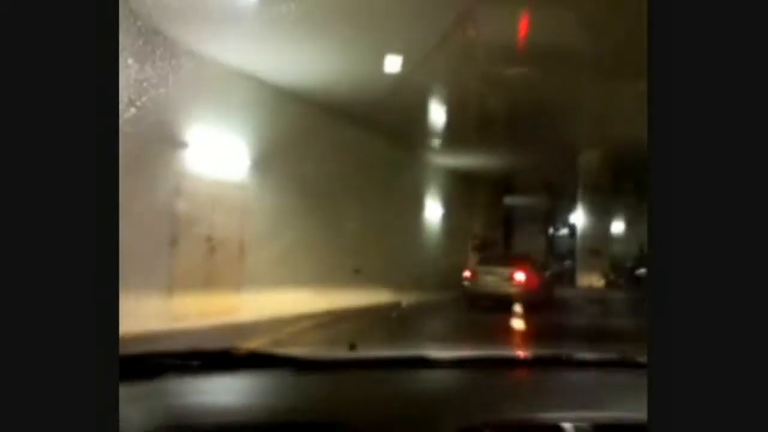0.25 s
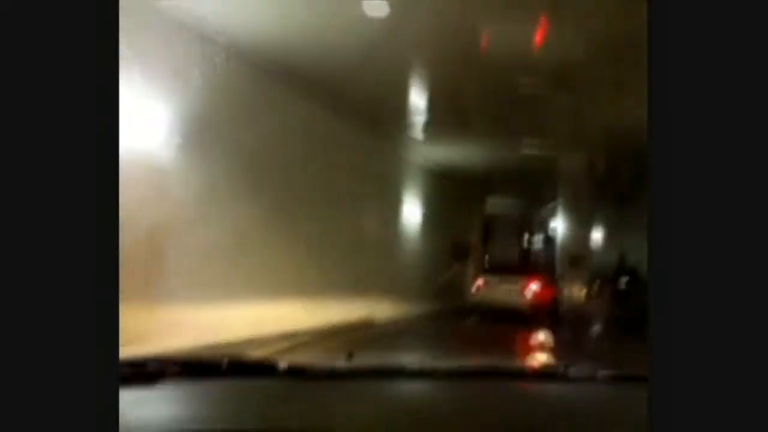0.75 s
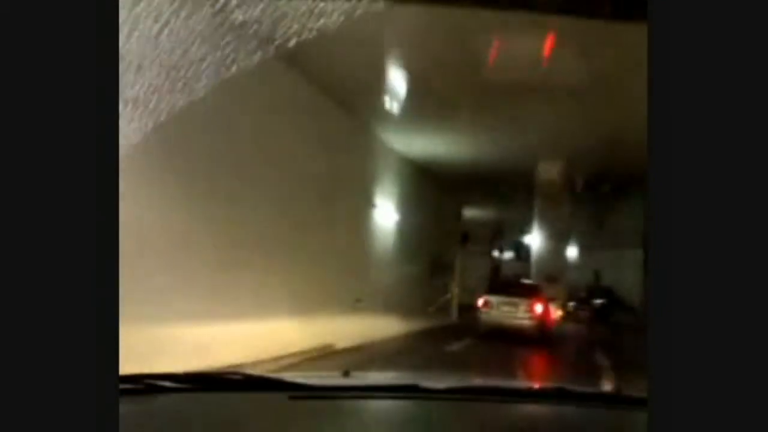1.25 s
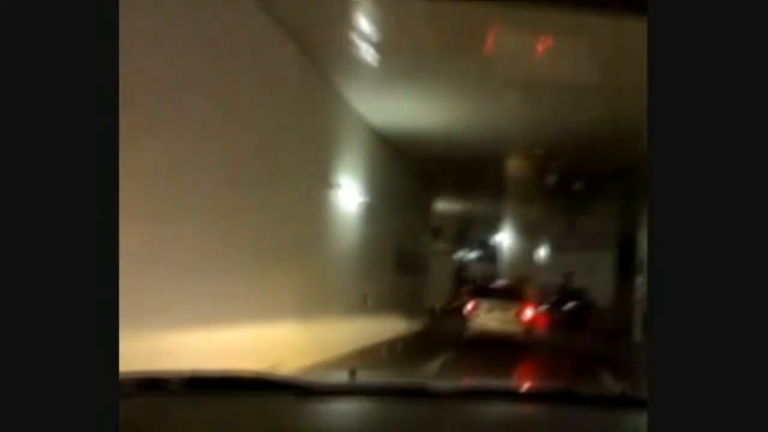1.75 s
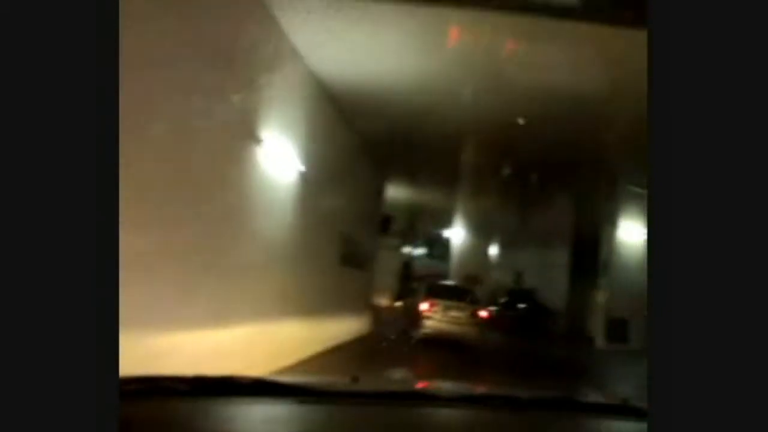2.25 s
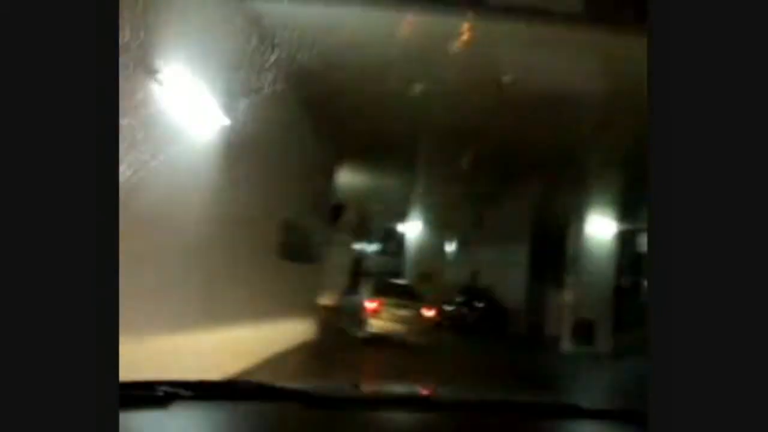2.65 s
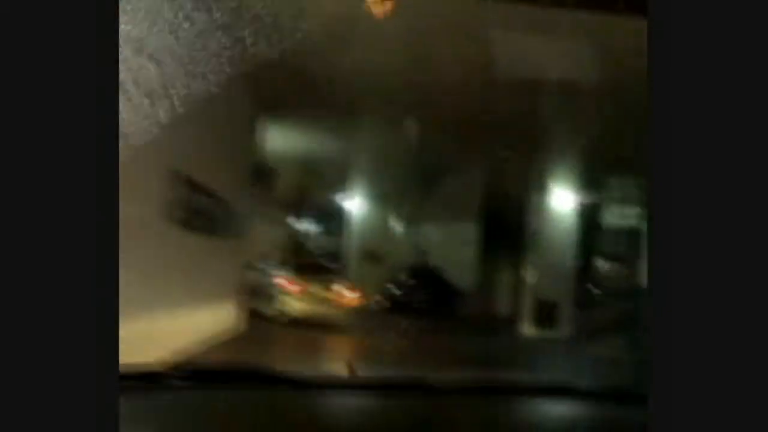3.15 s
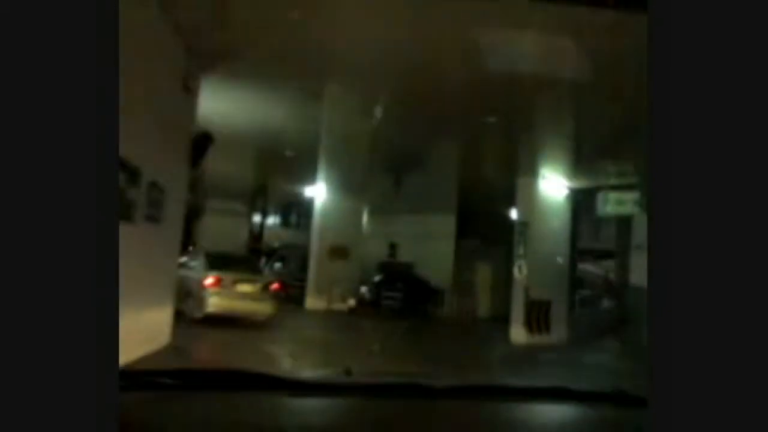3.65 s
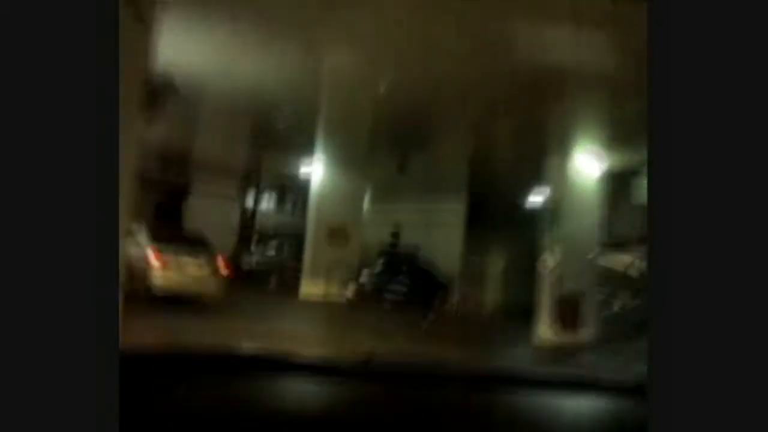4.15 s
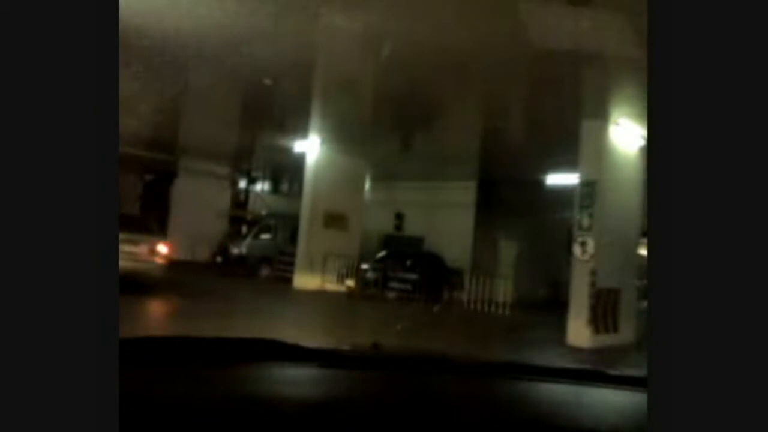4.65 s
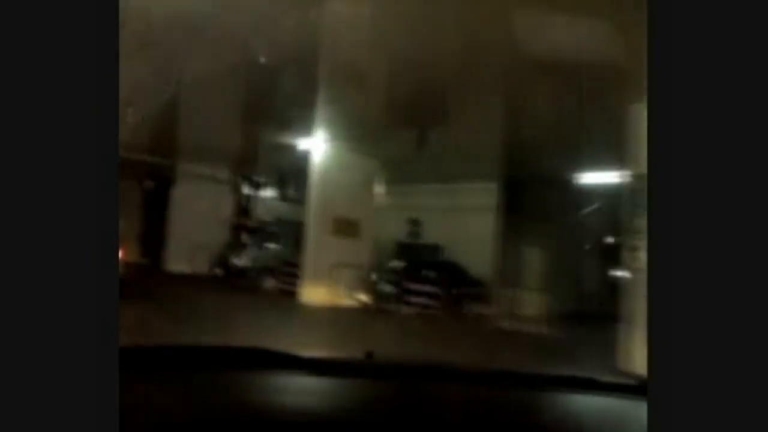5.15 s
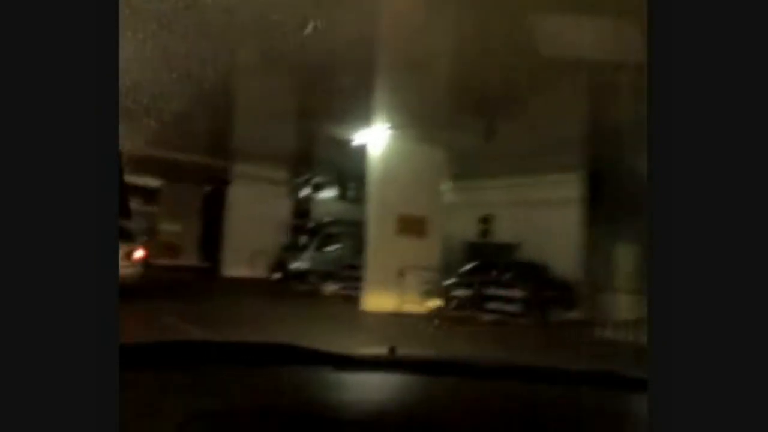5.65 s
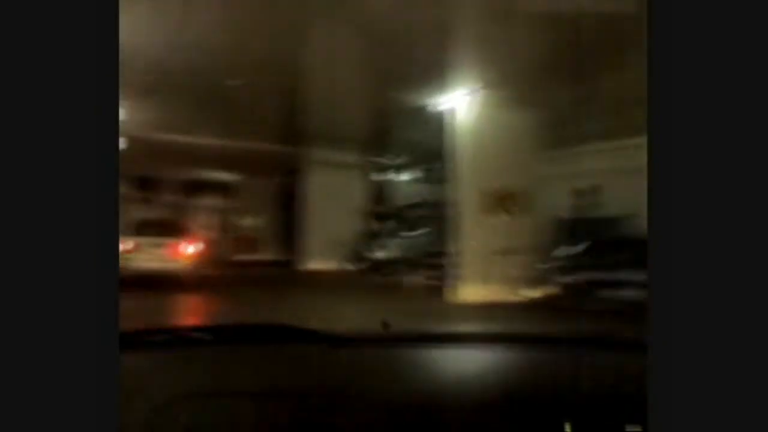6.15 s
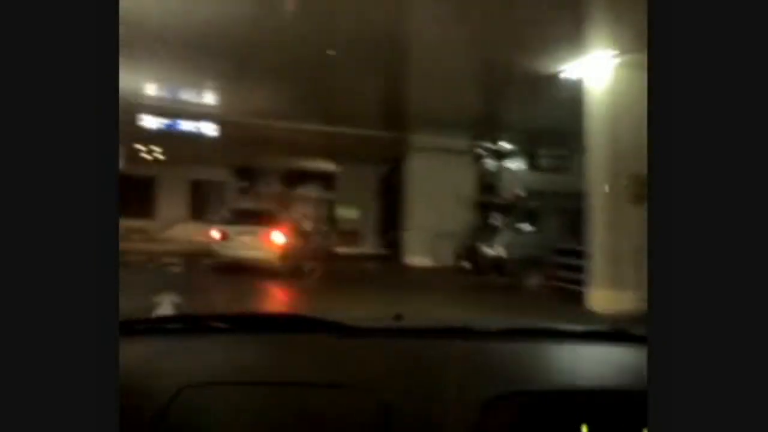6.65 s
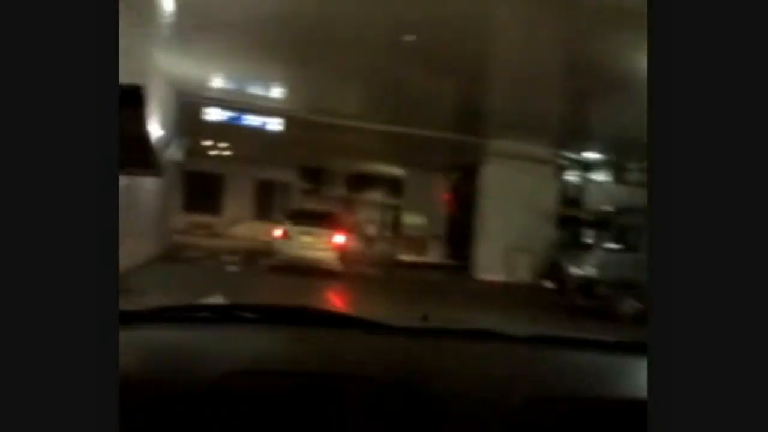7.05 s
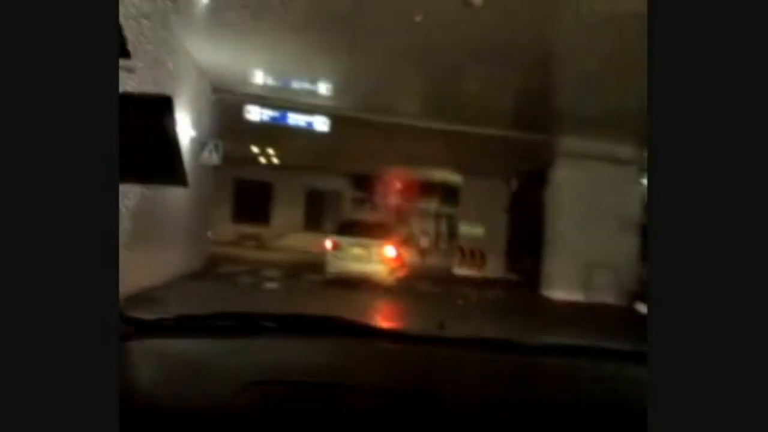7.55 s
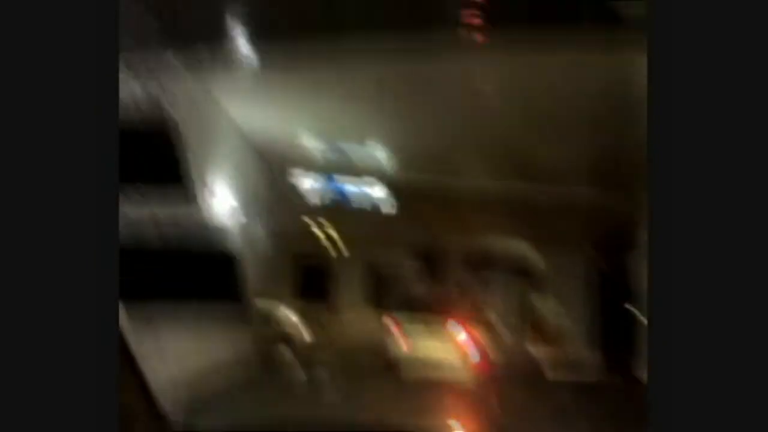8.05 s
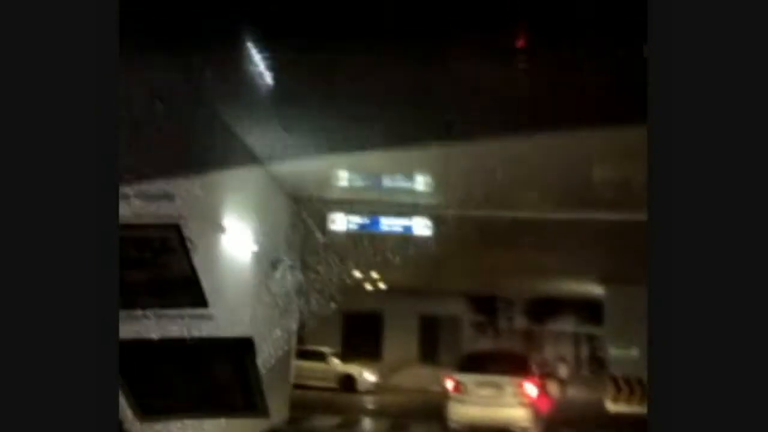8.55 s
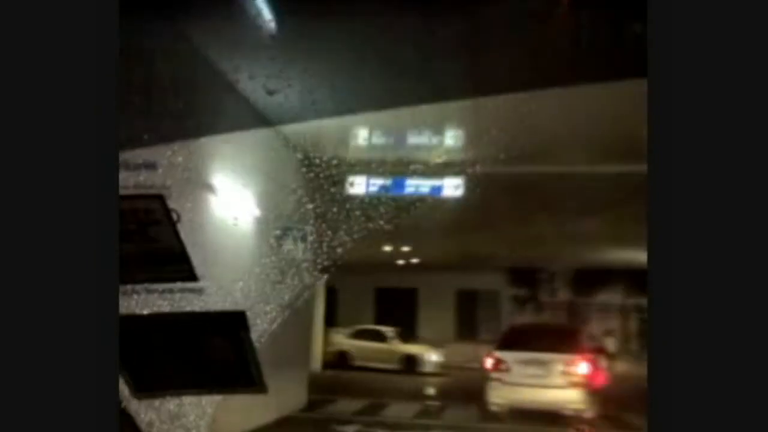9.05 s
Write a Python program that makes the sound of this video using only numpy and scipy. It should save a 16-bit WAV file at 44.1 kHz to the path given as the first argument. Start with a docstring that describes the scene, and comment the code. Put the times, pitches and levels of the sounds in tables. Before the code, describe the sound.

A muffled, droning car cabin creeps along concrete, its engine easing towards idle while trim clicks, body thumps and fingers scrape the camera.

```python
"""Inside a car creeping up the ramps of a multi-storey car park, heard by a small hand-held camera.
The engine and drive train hum slowly, built from sine waves that drift a little in pitch and strength.
Shaped noise makes the boom of the body, the rumble and roar of the tyres and the faint hiss of the wet deck.
Bumps knock the body, and plastic trim ticks and squeaks: short rings, noise bursts and sliding tones.
A hand taps and scrapes the camera, whose shell rings, and a sleeve rubs against the seat."""
import sys
import numpy as np
from scipy import signal
from scipy.fft import rfft, irfft, next_fast_len
from scipy.io import wavfile
from scipy.ndimage import uniform_filter1d

SR = 44100
rng = np.random.default_rng(int(sys.argv[2]) if len(sys.argv) > 2 else 0)


def persist_wave(psi):
    """Save psi, clipped to +-1, as 16-bit WAV."""
    counts = np.round(np.clip(psi, -1, 1) * 32767).astype(np.int16)
    wavfile.write(sys.argv[1], SR, np.atleast_2d(counts).T)


N = 409688
TIME = np.arange(N) / SR  # seconds


def undb(db):
    """Turn decibels into a gain."""
    return 10 ** (np.asarray(db) / 20)


def unit(x):
    """Scale a signal to an rms of 1."""
    return x / np.sqrt(np.mean(x ** 2) + 1e-18)


def seconds(length):
    """Time in seconds at each of a number of samples."""
    return np.arange(length) / SR


def curves(table):
    """Draw straight lines between the rows of a table, giving each column at every sample."""
    s, *columns = np.transpose(table)
    return [np.interp(TIME, s, column) for column in columns]


def walk(rate):
    """Smooth random wandering with an rms of 1, which takes a new direction rate times a second."""
    k = int(SR / rate)
    steps = np.repeat(rng.uniform(-1, 1, size=4096)[:N // k + 1], k)
    smooth = uniform_filter1d(uniform_filter1d(steps, k), k)
    return unit(smooth[:N])


def grain(length, size):
    """Quick random flutter with an rms of 1, smoothed over size samples."""
    return unit(uniform_filter1d(rng.standard_normal(length), size=size))


def noise(colour, size=N):
    """Noise of rms 1 with a spectrum of (Hz, dB) points, falling away beyond its ends."""
    hz, db = np.transpose(colour)
    n = next_fast_len(size)
    log_f = np.log(np.maximum(np.fft.rfftfreq(n, 1 / SR), 1))
    beyond = np.abs(log_f - np.clip(log_f, np.log(hz[0]), np.log(hz[-1])))
    gain = undb(np.interp(log_f, np.log(hz), db)) * np.exp(-2 * beyond)
    white = rng.standard_normal(n)
    return unit(irfft(rfft(white) * gain, n)[:size])


def steady(x, span_s):
    """Even out the slow swells of a noise by dividing by its local rms."""
    local_power = uniform_filter1d(x ** 2, max(int(span_s * SR), 2))
    return x / np.sqrt(local_power + 1e-9)


def add(out, s, sound):
    """Mix a sound in at a time in seconds."""
    i = int(s * SR)
    out[i:i + len(sound)] += sound[:N - i]


def fade(t, t60):
    """Exponential decay, 60 dB down after t60 seconds."""
    return np.exp(-np.log(1000) * t / t60)


def resonate(x, modes, strength):
    """Lift a sound at resonances: strongly when the part is touched, less for sound through the air."""
    lifted = 0
    for hz, width_hz, db in modes:
        b, a = signal.iirpeak(hz, hz / width_hz, fs=SR)
        lifted = lifted + (undb(db) - 1) * signal.lfilter(b, a, x)
    return x + strength * lifted


# The engine pulls up the ramp, then drops towards idle.
# Each row: time in seconds, firing rate in Hz before a small waver, level in dB before an overall trim.
ENGINE_CURVE = [(0, 40.69, -38.5), (.8, 41.55, -33), (1.5, 41.49, -36.5), (2.1, 40.64, -33.5),
                (2.8, 42.64, -35.5), (3.5, 40.7, -33.5), (4.3, 42.57, -43), (5.1, 43.1, -41.5),
                (5.85, 33.74, -45), (9.29, 33.19, -47.5)]
# Tones of the engine as they reach the cabin; the half multiples are the throb of uneven firing.
# Each row: multiple of the firing rate, average level in dB when pulling, average level in dB near idle.
ENGINE_ORDERS = [(1, 5, 2), (1.5, -11.5, -7), (2, -4, 0.5), (2.5, -7.5, -9), (3, -5.5, 3.5),
                 (3.5, -12, -4.5), (4, 0.5, -2.5), (4.5, -17, -9), (5, -18, -14), (6, -18.5, -10.5),
                 (8, -19, -20.5)]
PULL_HZ, IDLE_HZ = 40.4, 34  # firing rates under load and near idle


def engine(level_db=-2, waver_db=2.0):
    """Multiples of the firing rate, balanced by load; the mounts pass each one a little unevenly."""
    hz, db = curves(ENGINE_CURVE)
    load = np.clip((hz - IDLE_HZ) / (PULL_HZ - IDLE_HZ), 0, 1)
    hz = hz * (1 + .008 * walk(16))
    phase = 2 * np.pi * np.cumsum(hz) / SR
    hum = 0
    for multiple, pull_db, idle_db in ENGINE_ORDERS:
        order_db = idle_db + load * (pull_db - idle_db) + waver_db * walk(12)
        start_phase = 2 * np.pi * rng.random()
        hum = hum + undb(order_db) * np.sin(multiple * phase + start_phase)
    return hum * undb(db + level_db)


# The hum of the drive train.
# Each row: time in seconds, pitch in Hz before it drifts, level in dB before drift and an overall trim.
DRIVE_HUM_CURVE = [(0, 93, -45.5), (.8, 93.5, -40), (1.7, 89.5, -43), (2.5, 92, -41.5), (3.3, 91, -38),
                   (4.2, 91, -47.5), (5.3, 95, -40), (5.9, 101, -39), (6.6, 98, -40.5), (7.5, 100, -41.5),
                   (8.2, 94, -40), (9.29, 95, -45)]


def drive_hum(level_db=-1, waver_db=2.5, wander=0.0075):
    """A clean, low hum from the turning drive train that drifts in pitch and strength."""
    hz, db = curves(DRIVE_HUM_CURVE)
    phase = 2 * np.pi * np.cumsum(hz * (1 + wander * walk(9))) / SR
    return np.sqrt(2) * np.sin(phase) * undb(db + level_db + waver_db * walk(7))


# A jolt builds up, holds while the wheels cross the rough spot, then dies away.
JOLT_RISE_S, BOOM_T60_S, RUMBLE_T60_S = 0.033, 0.7, 0.1


def jolt(start_s, hold_s, t60):
    """Rise, hold and dying away of the shaking from one rough spot."""
    t = TIME - start_s
    return np.clip(t / JOLT_RISE_S, 0, 1) * fade(np.maximum(t - JOLT_RISE_S - hold_s, 0), t60)


# Colours of the body boom, the rumble of the cabin air and the tread roar.
# Each row: frequency in Hz, relative strength in dB per Hz.
BOOM_COLOUR = [(13, -27.5), (20, -5), (26, -1), (31, -1), (36, -9), (42, 6.5), (46.5, -10.5), (54, -26),
               (80, -33.5)]
RUMBLE_COLOUR = [(40, -23), (58, -6), (74, -1.5), (82, -6.5), (91, -2), (99, -2.5), (108, 0.5), (119, -4),
                 (130, 0), (146, -4.5), (158, -8.5), (174, -10.5), (190, -22.5), (260, -39)]
ROAR_COLOUR = [(130, -14), (205, 6), (240, -1.5), (275, -1.5), (380, -0.1), (455, -1.5), (560, -5.5),
               (650, -10.5), (810, -8.5), (930, -13), (1150, -14), (1450, -17.5), (2000, -24.5),
               (4000, -36.5)]
# Panels that colour the tread roar.
# Each row: frequency in Hz, width in Hz, lift in dB at full strength.
ROAR_PANELS = [(286.6, 20, 5), (338, 6.2, 4), (373.6, 16, 5), (449.5, 18, 4.5), (493, 7.7, 4.5),
               (545, 20, 4), (816, 16, 4), (1090, 38, 2.5)]
# Rough spots in the deck.
# Each row: start in seconds, body boom in dB, tyre rumble in dB, hold in seconds.
ROUGH_SPOTS = [(0.28, -26, -30, .03), (0.736, -27.5, -40.5, 0.17), (0.85, -36, -34, 0.13),
               (1.302, -23, -39, 0.1), (1.448, -27.5, -35.5, 0.28), (2.334, -26.5, -40, 0.16),
               (2.794, -35, -35, 0.15), (3.194, -30.5, -31.5, 0.049), (3.495, -30, -32.5, .03),
               (3.999, -32, -34, 0.29), (4.486, -24.5, -28, 0.034), (4.69, -29, -46, 0.15),
               (5.366, -27.5, -33.5, 0.24), (5.55, -29, -28.5, 0.019), (5.929, -30, -36, 0.022),
               (6.174, -30, -33, 0.034), (6.487, -39, -37.5, 0.017), (6.59, -28, -55, 0.19),
               (7.022, -28, -51, 0.035), (7.475, -30.5, -35, 0.016), (7.755, -47, -29.5, 0.031),
               (8.405, -32, -29, 0.12), (8.685, -30.5, -36.5, 0.38)]
BOOM_DB, RUMBLE_DB = -33, -35  # on smooth concrete
ROAR_DB, ROAR_FALL_DB_PER_S = -42.5, 0.5865  # at the start, and its steady fall as the car slows


def road(patchy_db=1.0):
    """Concrete shakes the tyres: the body booms, the cabin air rumbles, the tread roars in patches."""
    boom_power, rumble_power = undb(BOOM_DB) ** 2, undb(RUMBLE_DB) ** 2
    for s, boom_db, rumble_db, hold_s in ROUGH_SPOTS:
        boom_power = boom_power + (undb(boom_db) * jolt(s, hold_s, BOOM_T60_S)) ** 2
        rumble_power = rumble_power + (undb(rumble_db) * jolt(s, hold_s, RUMBLE_T60_S)) ** 2
    body = steady(noise(BOOM_COLOUR), 0.099) * np.sqrt(boom_power)
    air = steady(noise(RUMBLE_COLOUR), .12) * np.sqrt(rumble_power)
    roar_db = ROAR_DB - ROAR_FALL_DB_PER_S * TIME + patchy_db * walk(22)
    tread = unit(resonate(noise(ROAR_COLOUR), ROAR_PANELS, strength=0.78)) * undb(roar_db)
    return body + air + tread


# Knocks through the body; the row at 7.928 s is the low body of a knock on the camera. # Each row: start in
# seconds, level in dB, pitch in Hz where the blow is strongest, # time in seconds for the crowded modes to fade
# by 60 dB.
KNOCKS = [(2.055, -34.5, 440, 0.12), (2.056, -44, 266, 0.17), (5.505, -33, 450, 0.11),
          (5.504, -40, 1765, 0.075), (5.551, -29, 340, 0.11), (5.555, -46.5, 1650, .09),
          (5.583, -34, 300, 0.11), (5.598, -27, 262, 0.12), (5.599, -27, 435, 0.082),
          (5.601, -31, 780, 0.055), (5.601, -33, 1290, 0.065), (5.602, -41.5, 2500, 0.075),
          (5.606, -24.5, 127, 0.17), (5.619, -38, 1200, 0.062), (6.431, -30.5, 826, 0.048),
          (6.431, -40, 1800, .03), (6.436, -33.5, 1210, 0.035), (6.443, -31, 531, 0.07),
          (6.465, -45.5, 1580, .06), (6.521, -35, 1400, 0.035), (7.928, -34, 380, 0.096),
          (8.443, -35, 418, 0.15), (8.444, -32.5, 206, 0.16), (8.441, -42, 1037, 0.12),
          (8.475, -34, 380.5, 0.065), (8.518, -32.5, 418, 0.11), (8.535, -34, 134, 0.27),
          (8.548, -43.5, 1060, 0.19)]
# The body panel under a knock.
# Each row: multiple of the knock's pitch, relative strength in dB per Hz.
PANEL_COLOUR = [(.15, -15.5), (.4, 3.5), (.75, -0.5), (1, -0.5), (1.5, -19.5), (2.6, -21.5), (4, -23),
                (7, -28), (16, -49)]
# Low modes of the dashboard.
# Each row: frequency in Hz, relative level in dB, time in seconds to fade by 60 dB.
DASH_MODES = [(127, 8.5, 0.26), (160, -8.5, 0.16), (266, 3.5, 0.14), (355, -2.5, 0.18), (441, -2, 0.11),
              (794, 0.5, 0.087)]


def knocks(rise_s=0.0013, ring_db=1, dash_db=-6, reach=0.62, padding_hz=2600):
    """A bump jolts a padded panel: a damped main mode among crowded ones, and the dashboard hums on. The row at
    7.928 s instead gives low body to a finger knocking the camera."""
    out, t = np.zeros(N), seconds(SR // 4)
    for s, db, hz, t60 in KNOCKS:
        colour = [(hz * multiple, d) for multiple, d in PANEL_COLOUR]
        crowd = steady(noise(colour, size=len(t)), 0.032) * fade(t, t60)
        mode = undb(ring_db) * np.sin(2 * np.pi * hz * t) * fade(t, t60 * 2 / 3)
        dash = 0
        for f, d, ring_t60 in DASH_MODES:
            # modes near the pitch of the blow are set ringing most; reach is in octaves
            nearness = np.exp(-(np.log2(f / hz) / reach) ** 2 / 2)
            dash = dash + undb(d + dash_db) * nearness * np.sin(2 * np.pi * f * t) * fade(t, ring_t60)
        add(out, s, undb(db) * (crowd + mode + dash) * (1 - np.exp(-t / rise_s)))
    padding = signal.butter(2, padding_hz, fs=SR, output="sos")
    return signal.sosfilt(padding, out)


# Plastic ticks.
# Each row: start in seconds, peak in dB before the force setting, treble in dB, which sets the brightness.
TICKS = [(2.3255, -41.5, -71), (2.8424, -49.5, -51), (2.9916, -45, -43.5), (3.419, -41, -44),
         (3.6435, -43.5, -39), (4.168, -51.5, -52), (4.4116, -51, -48), (4.5716, -46, -46),
         (4.6503, -42, -59), (5.0222, -44, -78), (5.221, -37, -76), (5.656, -40.5, -47), (6.5126, -24, -31),
         (6.6524, -31, -51), (6.7639, -50, -53), (6.9336, -58, -43), (7.2429, -17.5, -28.5),
         (7.4006, -40.5, -43), (7.44, -32, -38), (7.882, -36, -38), (7.885, -33, -33), (8.269, -31, -47),
         (8.525, -29.5, -21), (9.2394, -45, -56)]
# What the plastic rings with.
# Each row: frequency in Hz before a small random shift, level in dB before the tilt,
# time in seconds to fade by 60 dB.
PLASTIC_MODES = [(1400, -21.5, .014), (1720, -1.5, 0.007), (2380, 0, 0.012), (3240, -4.5, 0.0041),
                 (4360, -10.5, 0.0047), (5400, -15, 0.0035), (6400, -30.5, .004)]


def ticks(level_db=0.5, bright=0.88, tail_t60=0.08, force=1.14, chatter_db=-7, chatter_falls=0.89):
    """Plastic parts snap together and ring briefly; a light touch chatters on, a hard one snaps once."""
    out, t = np.zeros(N), seconds(SR // 8)
    middle_db = np.median(np.array(TICKS)[:, 1])
    for s, db, treble_db in TICKS:
        tilt_db = bright * (treble_db - db + 12.5)  # per octave: a harder contact is brighter
        ring, colour, sign = 0, [], 1
        for hz, mode_db, t60 in PLASTIC_MODES:
            tilted_db = mode_db + tilt_db * np.log2(hz / 2400)
            colour.append((hz, tilted_db))
            shifted_hz = hz * rng.normal(1, 0.022)
            ring = ring + sign * undb(tilted_db) * np.sin(2 * np.pi * shifted_hz * t) * fade(t, t60)
            sign = -sign  # neighbouring modes start in opposite directions
        ring = ring * (1 - np.exp(-t / 0.0002))
        chatter = noise(colour, size=len(t)) * fade(t, tail_t60)
        excess_db = db - middle_db
        snap = ring / np.abs(ring).max() + undb(chatter_db - chatter_falls * excess_db) * chatter
        add(out, s, undb(middle_db + force * excess_db + level_db) * snap)
    return out


# Fingers tapping and scraping the camera.
# Each row: start in seconds, level in dB before the shell rings, rise in seconds,
# time in seconds to fade by 60 dB.
SCRAPES = [(1.933, -44.5, 0.0017, .09), (2.054, -49.5, 0.004, 0.13), (5.022, -47, .001, 0.036),
           (5.222, -46, .001, .035), (5.503, -43, .0007, .05), (6.935, -44, 0.0005, 0.054),
           (7.437, -53, 0.0062, 0.15), (7.837, -47, 0.0032, 0.11), (7.851, -37.5, 0.0012, 0.047),
           (7.861, -41, .002, 0.1), (7.918, -30, 0.0016, 0.038), (7.9254, -20, 0.00089, 0.04),
           (7.932, -27.5, 0.001, 0.027), (7.94, -34, 0.00081, 0.068), (8.108, -48, 0.00044, 0.014),
           (8.166, -38, .0004, 0.013), (8.525, -28, 0.00026, 0.013)]
# Colour of the scraping. Each row: frequency in Hz, relative strength in dB per Hz.
SCRAPE_COLOUR = [(300, -9.5), (750, -17.5), (1050, 2), (1400, 0.5), (1700, -1.5), (2400, -3), (3000, -2.5),
                 (3500, -3), (5200, -8), (6200, -7.5), (7500, -20)]
# Resonances of the camera shell, also used by the clacks and the rustle.
# Each row: frequency in Hz, width in Hz before extra damping, strength in dB before scaling or tilt.
SHELL_MODES = [(1030, 90, 6), (1119, 45, 9.5), (1236, 40, 7), (1305, 40, 8.5), (1400, 40, 8), (2370, 45, 4),
               (2522, 46, 8.5), (2860, 55, 7), (3040, 70, 4.5), (3305, 70, 4), (3965, 55, 2.5),
               (4528, 45, 3.5), (4883, 40, 6), (5113, 55, 10.5), (5320, 40, 6), (6450, 70, 5),
               (7050, 80, 4)]


def scrapes(grit_db=3):
    """Skin slips over the camera in a quick run of tiny catches, which ring its shell."""
    out, t = np.zeros(N), seconds(SR // 4)
    for s, db, rise_s, t60 in SCRAPES:
        catches = undb(grit_db * grain(len(t), size=60))
        friction = steady(noise(SCRAPE_COLOUR, size=len(t)) * catches, 0.0059)
        add(out, s, undb(db) * friction * (1 - np.exp(-t / rise_s)) * fade(t, t60))
    return resonate(out, SHELL_MODES, strength=0.92)


# A finger catches and knocks the shell. Each row: start in seconds, level in dB over the first 5 ms.
CLACKS = [(7.8525, -49), (7.9249, -26.5), (7.9274, -25), (7.9395, -36)]


def clacks(tilt_db=-2.5, damping=2.0):
    """A knock on the camera rings all the modes of its shell, tilted towards the low ones (dB per octave)."""
    out, t = np.zeros(N), seconds(SR // 8)
    for s, db in CLACKS:
        ring = 0
        for hz, width_hz, d in SHELL_MODES:
            gain = undb(d + tilt_db * np.log2(hz / 1000))
            tone = np.sin(2 * np.pi * (hz * t + rng.random()))
            ring = ring + gain * tone * np.exp(-np.pi * width_hz * damping * t)
        add(out, s, undb(db) * ring / ring[:SR // 200].std())
    return out


# Squeaks of trim.
# Each row: middle in seconds, level in dB before an overall trim, pitch in Hz, half length in seconds,
# roughness from 0 to 1, rise of pitch per second as a share.
SQUEAKS = [(0.613, -56, 3410, 0.035, 0.012, 0.5), (0.89, -60, 3460, 0.125, 0.02, 0),
           (6.39, -35.5, 1280, 0.0076, 0.06, 0), (8.2215, -30, 1410, 0.0052, 0.05, -0.5),
           (8.227, -38, 1400, 0.0046, 0, 3), (8.901, -33, 1453, 0.0049, .03, 7),
           (8.911, -38, 1490, 0.0038, 0, 1)]
# Overtones of a squeak. Each row: multiple of its pitch, relative level in dB.
SQUEAK_OVERTONES = [(1, -3), (2, -17), (3, -24), (4, -24)]


def squeaks(level_db=-2, flutter_db=2):
    """Trim sticks and slips in a short, sliding run of cycles of uneven length and strength."""
    out, t = np.zeros(N), np.arange(-SR // 2, SR // 2) / SR
    for s, db, hz, half_s, rough, glide in SQUEAKS:
        pitch_hz = hz * (1 + glide * t + rough * grain(len(t), size=50))
        phase = 2 * np.pi * np.cumsum(pitch_hz) / SR
        tone = sum(undb(d) * np.sin(multiple * phase) for multiple, d in SQUEAK_OVERTONES)
        tone = tone * undb(flutter_db * grain(len(t), size=120))
        add(out, s + t[0], undb(db + level_db) * tone * np.exp(-(t / half_s) ** 2))
    return out


# A sleeve slides against the seat.
# Each row: start in seconds, level in dB before the rustle is mixed, length in seconds.
RUBS = [(0.552, -53.5, 0.16), (7.255, -50, 0.17), (8.268, -47, 0.36)]
# Colour of the cloth. Each row: frequency in Hz, relative strength in dB per Hz.
RUB_COLOUR = [(1200, -23.5), (1700, 2), (2050, -1), (2450, 3), (3100, -5.5), (4200, -9.5), (6500, -28)]


def rubs(grain_db=2.0, rise_s=0.0046):
    """Cloth starts to slide at once and eases off as the arm comes to rest."""
    envelope = 0
    for s, db, length_s in RUBS:
        t = np.maximum(TIME - s, 0)
        envelope = envelope + undb(db) * (1 - np.exp(-t / rise_s)) * np.exp(-(t / length_s) ** 2)
    return noise(RUB_COLOUR) * envelope * undb(grain_db * walk(120))


# Swells of swishing, as wet patches pass or clothes shift.
# Each row: middle in seconds, swish in dB, hiss in dB (both before the rustle is mixed),
# half length in seconds.
SWELLS = [(2.5, -64.5, -67, 0.43), (3.389, -55.5, -60.5, 0.2), (3.998, -70, -63.5, 0.07),
          (4.96, -60, -61.5, 0.29), (5.478, -56.5, -63, 0.31), (6.242, -54, -60.5, 0.56),
          (7.01, -59.5, -57, 0.068), (7.376, -55.5, -61.5, 0.21), (8.272, -55, -52, 0.044),
          (8.53, -52, -56, 0.27), (8.95, -63.5, -67, 0.54)]
# Colours of the swish and its finer hiss. Each row: frequency in Hz, relative strength in dB per Hz.
SWISH_COLOUR = [(600, -14), (1100, -0.5), (1400, 3.5), (1700, 0.5), (2400, 1.5), (3300, 0.5), (4200, -3),
                (6000, -35.5)]
HISS_COLOUR = [(2500, -14.5), (4000, 0), (5200, 2.5), (6400, -0.5), (7400, -8), (9000, -22.5)]
SWISH_DB, HISS_DB = -59.5, -67  # steady levels before the rustle is mixed


def swish(grain_db=1.28):
    """Wet tyres and shifting clothes: a swish and a finer hiss that swell together and share one grain."""
    swish_power, hiss_power = undb(SWISH_DB) ** 2, undb(HISS_DB) ** 2
    for s, swish_db, hiss_db, half_s in SWELLS:
        swell = np.exp(-((TIME - s) / half_s) ** 2)
        swish_power = swish_power + (undb(swish_db) * swell) ** 2
        hiss_power = hiss_power + (undb(hiss_db) * swell) ** 2
    both = noise(SWISH_COLOUR) * np.sqrt(swish_power) + noise(HISS_COLOUR) * np.sqrt(hiss_power)
    return both * undb(grain_db * walk(70))


def cabin(x):
    """Glass and trim send back a few faint, close reflections that ripple the spectrum."""
    response = np.zeros(SR // 40)
    lags = rng.integers(SR // 500, len(response), size=14)  # from 2 to 25 ms
    response[lags] = undb(-17) * rng.choice([-1, 1], size=14) * fade(lags / SR, .08)
    response[0] = 1  # the direct sound
    return signal.fftconvolve(x, response / np.linalg.norm(response))[:N]


def scene():
    """Everything as it meets at the dashboard."""
    rustle = resonate(cabin(swish() + rubs()), SHELL_MODES, strength=0.13) * undb(-0.77)
    driving = engine() + drive_hum() + road()
    body_noises = knocks() + ticks() + squeaks()
    handling = scrapes() + clacks()
    return (driving + body_noises + handling + rustle)[None]


TOP_HZ = 7450  # where the camera's treble ends
OFFSET = -.0535  # resting level of the camera, as a share of full scale


def record(dry):
    """The camera cuts the treble and rests slightly off zero."""
    treble_cut = signal.ellip(10, .2, 70, TOP_HZ, fs=SR, output="sos")
    return signal.sosfilt(treble_cut, dry) + OFFSET


dry = scene()
out = record(dry)
persist_wave(out)
```